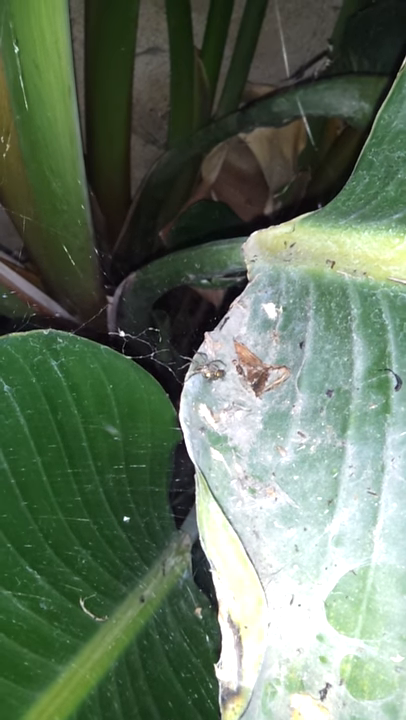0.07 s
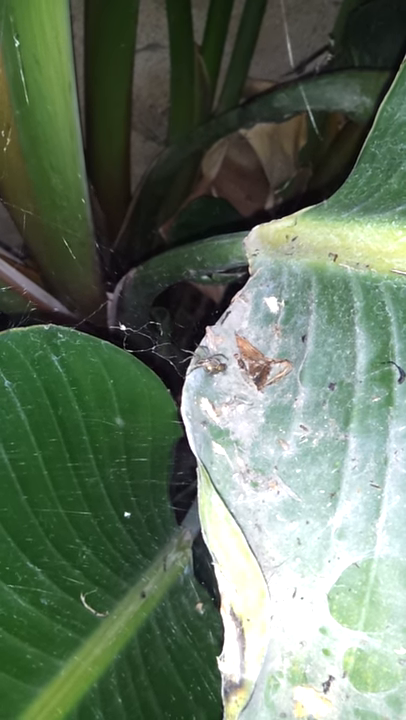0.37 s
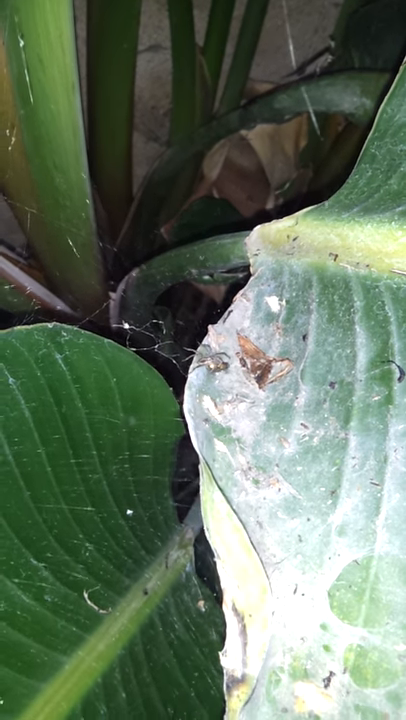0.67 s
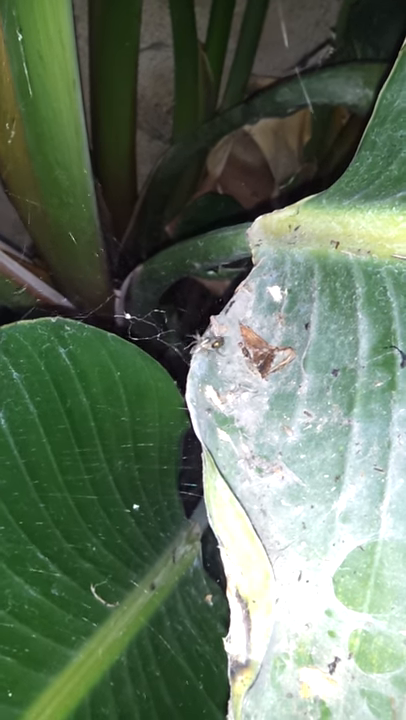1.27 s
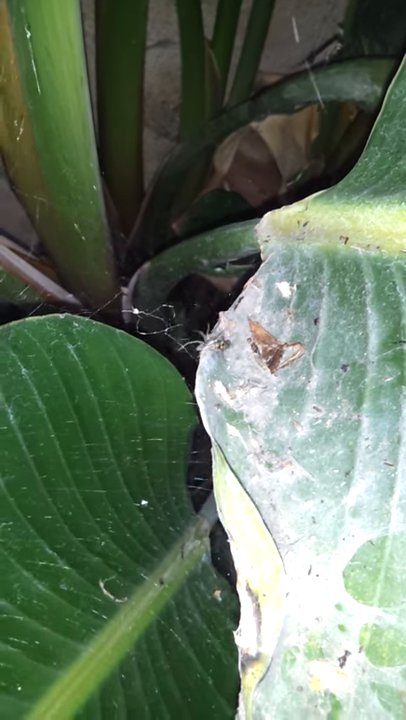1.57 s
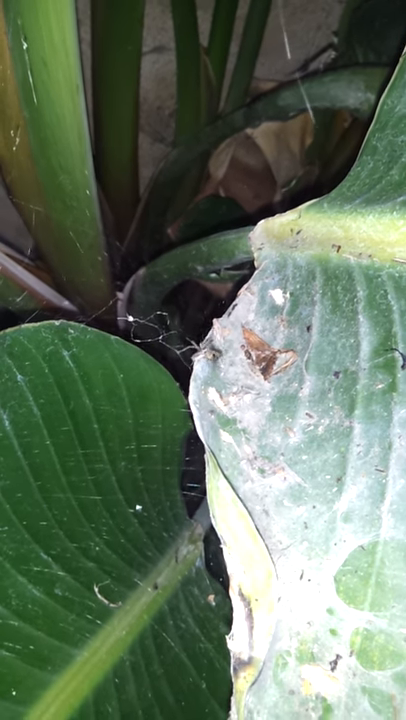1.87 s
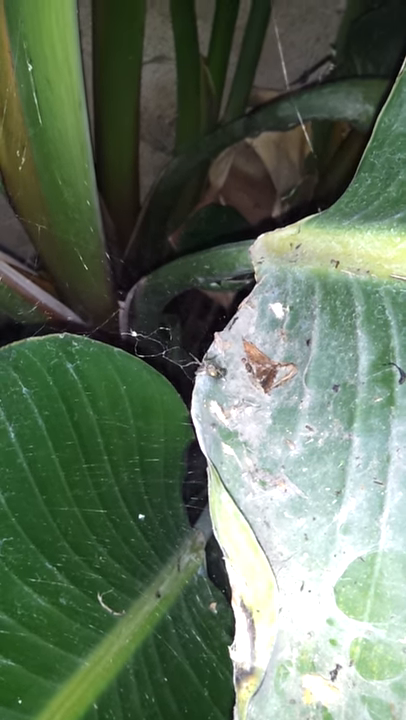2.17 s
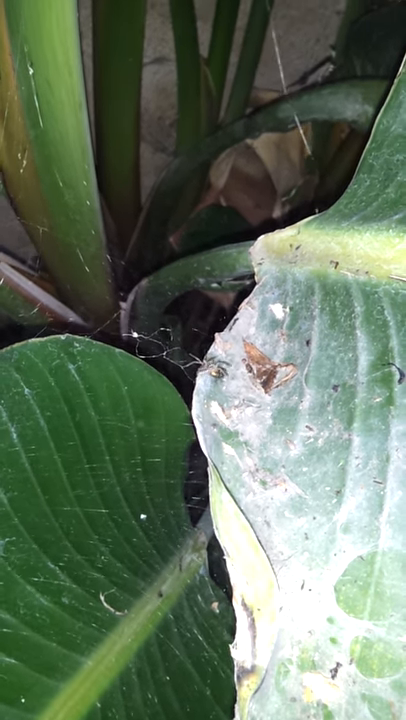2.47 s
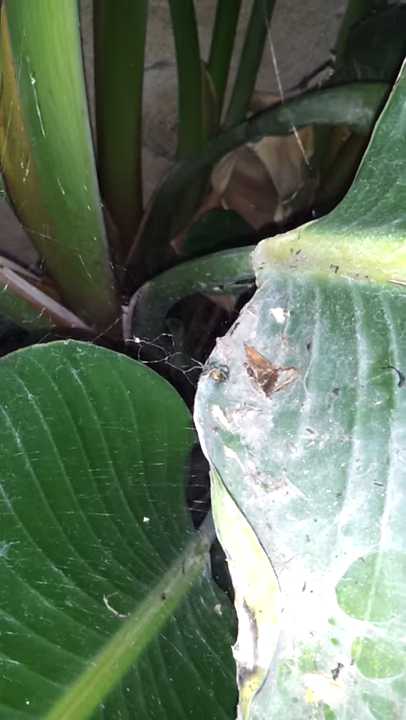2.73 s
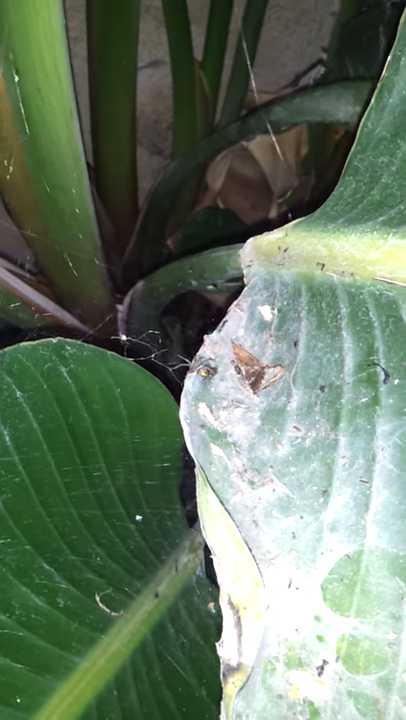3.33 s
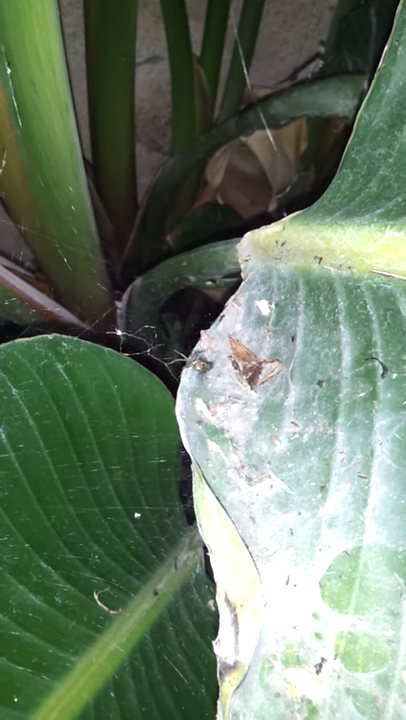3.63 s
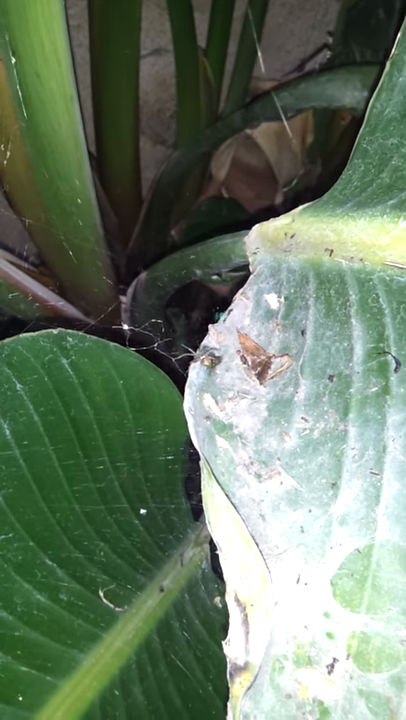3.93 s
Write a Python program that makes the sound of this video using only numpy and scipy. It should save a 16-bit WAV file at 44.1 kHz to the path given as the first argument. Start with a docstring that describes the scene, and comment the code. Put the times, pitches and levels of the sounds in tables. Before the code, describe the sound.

Distant traffic rumbles steadily behind a garden, with a faint bird chirping.

```python
"""A garden bed in town, one microphone in among large leaves. From the start distant traffic rumbles
under a wash of tyre noise, far engines and machinery swell and fade, and a faint hiss sits on top.
Almost at once a small bird gives thin, mostly falling calls, echoed by walls. At about 1.6 s a leaf
brushes softly close to the microphone, and again near 2.1 s. The bird calls on, ending in a flurry."""
import sys
import numpy as np
from scipy import signal
from scipy.fft import rfft, irfft
from scipy.io import wavfile

SR = 44100
rng = np.random.default_rng(int(sys.argv[2]) if len(sys.argv) > 2 else 0)


def unload_audio(sound):
    """Save the sound as a 16-bit wav file, at the path given as the first command line argument."""
    columns = np.transpose(np.atleast_2d(sound))
    # keep every value between -1 and 1, then stretch to whole-number steps
    steps = np.round(np.clip(columns, -1, 1) * 32767)
    wavfile.write(sys.argv[1], SR, steps.astype(np.int16))


N = 176400


def undb(db):
    """Decibels to gain."""
    return 10 ** (np.asarray(db) / 20)


def unit(x):
    """Scale to rms 1."""
    return x / np.sqrt(np.mean(x ** 2))


def times():
    """Time of each sample in s."""
    return np.arange(N) / SR


def curve(rows):
    """Each column of a table joined by straight lines in time."""
    rows = np.array(rows, float)
    return [np.interp(times(), rows[:, 0], col) for col in rows.T[1:]]


def walk(rate_hz):
    """Smooth random motion with spread 1, up to about rate_hz."""
    f = np.arange(N + 1) * SR / (2 * N)
    white = rfft(rng.standard_normal(2 * N))
    return unit(irfft(white * np.exp(-(f / rate_hz) ** 2)))[:N]


def coloured(points):
    """Noise of rms 1 with a spectrum of (Hz, dB) points, falling away below the first."""
    hz, db = np.array(points, float).T
    f = np.maximum(np.arange(N // 2 + 1) * SR / N, 1)
    gain = undb(np.interp(np.log(f), np.log(hz), db))
    low_cut = np.minimum(f / hz[0], 1) ** 2
    return unit(irfft(rfft(rng.standard_normal(N)) * gain * low_cut, N))


# Distant streets as they reach the garden (frequency [Hz], relative density [dB])
TRAFFIC_SPECTRUM = [(20, -4.5), (32, 4.5), (50, -3), (92, 1), (118, -8), (150, -8.5), (185, -6.5),
                    (210, -7.5), (255, -9.5), (320, -13), (425, -18), (470, -14.5), (560, -18),
                    (740, -18.5), (1030, -16.5), (1350, -21), (2000, -30.5), (3000, -38.5), (6000, -49.5)]

def traffic(level_db=-32.5, swell_db=0.42, flicker_db=0.13, recede_db_per_s=0.05, bands=9):
    """Distant rumble and tyre wash, in octave bands that swell together and flicker alone."""
    spectrum = rfft(coloured(TRAFFIC_SPECTRUM))
    swell = swell_db * walk(0.58) - recede_db_per_s * (times() - N / SR / 2)
    hz = np.maximum(np.arange(N // 2 + 1) * SR / N, 1)
    octave = np.clip(np.log2(hz / 20), 0, bands - 1)
    wash = np.zeros(N)
    for k in range(bands):
        band = irfft(spectrum * np.maximum(1 - abs(octave - k), 0), N)
        wash += band * undb(swell - flicker_db * walk(21))
    return undb(level_db) * wash


# Two vehicles streets away, one low-revving, one pulling off (time [s], firing rate [Hz], level [dB])
LOW_REVVING = [(0, 50.7, -23), (.25, 53, -36), (.45, 56.2, -30), (.62, 56.25, -39), (1.2, 53.7, -31.5),
               (1.5, 54.96, -40), (1.8, 55.1, -36.5), (2.3, 55, -37.5), (2.52, 54.9, -28.5),
               (2.75, 54.9, -48), (3.0, 54, -27), (3.4, 54.77, -42), (3.68, 55.2, -31), (4, 54.8, -36)]
PULLING_AWAY = [(0, 68.4, -64), (.15, 68.1, -44), (.35, 69.37, -31.5), (.75, 72.9, -34.5),
                (1.15, 74.86, -38.5), (1.5, 73.16, -33), (1.8, 72.05, -47.5), (2.12, 69.93, -27),
                (2.4, 72.9, -39.5), (2.72, 75.86, -28), (3.12, 76.3, -29), (3.35, 77.3, -39),
                (3.5, 79.15, -30), (3.65, 78.9, -42), (4, 77, -38)]

def exhaust(rows, smear=0.33, smear_hz=26, octave_db=-17.5):
    """A far engine's firing tone and its octave, smeared by many paths through the streets."""
    hz, db = curve(rows)
    firing = np.exp(2j * np.pi * (np.cumsum(hz) / SR + rng.random()))
    tone = firing + undb(octave_db) * firing ** 2
    paths = 1 + smear * (walk(smear_hz) + 1j * walk(smear_hz))
    return undb(db) * unit((paths * tone).real)


# Three hums of machinery far beyond the garden (time [s], pitch [Hz], level [dB])
LOW_HUM = [(0, 146, -38.5), (.25, 145, -38.5), (.75, 145.1, -53.5), (.95, 145.3, -37.5), (1.05, 146, -42),
           (1.22, 145.7, -34.5), (1.6, 145, -44), (2.05, 145.2, -47), (2.3, 144.3, -41), (2.6, 146, -36.5),
           (3.3, 144.6, -35), (4, 144, -38.5)]
MID_HUM = [(0, 263.8, -49.5), (.3, 267.8, -44.5), (.6, 276.6, -55), (1.4, 275, -56.5), (2.0, 276, -45),
           (2.4, 274.6, -48), (3.05, 277.4, -47), (4, 279, -50.5)]
HIGH_HUM = [(0, 383.4, -57), (.8, 378.2, -52), (1.9, 385.3, -51), (2.7, 380.6, -47), (3.2, 384.7, -52.5),
            (4, 385.9, -52.5)]

def machinery(rows, pitch_wander=0.00331, waver_db=1.36):
    """A far machine's clean hum, wavering a little in pitch and level."""
    hz, db = curve(rows)
    cycles = np.cumsum(hz * (1 + pitch_wander * walk(4.37))) / SR + rng.random()
    return np.sqrt(2) * np.sin(2 * np.pi * cycles) * undb(db + waver_db * walk(7.8))


# Colour of the background hiss (frequency [Hz], relative density [dB])
HISS_SPECTRUM = [(1500, -26), (3000, -5), (4200, 0.5), (5400, 2), (6300, -.5), (7200, 1.5), (8000, -0.5),
                 (10000, 1), (12000, -2)]
# Its strength at the microphone (time [s], level [dB])
HISS_CONTOUR = [(0, -55), (.2, -55.5), (.35, -58), (.55, -57.5), (.78, -54.5), (1.03, -55), (1.13, -58.5),
                (1.25, -58.5), (1.42, -53), (1.55, -55.5), (1.76, -54), (1.89, -58.5), (2.0, -54),
                (2.4, -54), (2.8, -55.5), (3.45, -56.5), (3.58, -55), (4, -58)]

def hiss():
    """Faint high hiss that rises and sinks slightly."""
    db, = curve(HISS_CONTOUR)
    return coloured(HISS_SPECTRUM) * undb(db)


# A small bird, faint at the microphone
# (start [s], length [s], glide from [Hz], glide to [Hz], level [dB], rasp [0-1])
BIRD_NOTES = [(0.03, 0.12, 5300, 5340, -61, .9), (.18, 0.11, 4750, 4000, -54, 0.6),
              (0.879, 0.13, 5060, 4950, -61, .6), (1.389, .12, 7370, 7360, -66, 0.89),
              (1.965, 0.11, 5600, 5500, -61, .4), (2.193, .06, 5000, 5100, -58, .3),
              (2.272, .05, 5540, 5650, -60, 0.35), (2.715, 0.036, 3550, 3400, -58, 0.36),
              (3.559, 0.1, 5300, 5400, -55.5, 1), (3.66, 0.0877, 5415, 5100, -63, 0.89),
              (3.68, .2, 8630, 6850, -67, .5), (3.732, 0.14, 4726, 3800, -57.5, 0.7)]

def bird(scoop=0.12, scoop_s=0.014, ramp_s=0.012, rasp_width_hz=450, rasp_fade_s=0.11):
    """Thin notes that scoop up with a rasp, then glide and fade."""
    t, calls = times(), np.zeros(N)
    pitch_jitter = 1 + 0.026 * walk(367)
    flutter = walk(rasp_width_hz) + 1j * walk(rasp_width_hz)
    for start, length, from_hz, to_hz, db, rasp in BIRD_NOTES:
        age = np.clip(t - start, 0, length)
        progress = age / length
        glide = from_hz + (to_hz - from_hz) * progress
        hz = glide * (1 - scoop * np.exp(-age / scoop_s)) * pitch_jitter
        ramps = np.minimum(np.minimum(age, length - age) / ramp_s, 1)
        envelope = ramps * np.exp(-0.4 * progress)
        whistle = np.exp(2j * np.pi * np.cumsum(hz) / SR)
        roughness = 1 + rasp * flutter * np.exp(-age / rasp_fade_s)
        calls += undb(db) * envelope * (whistle * roughness).real
    return calls


def walls(direct, t60_s=0.55, echo_db=-0.5):
    """The direct sound plus a short tail of reflections off the walls round the garden."""
    tail = rng.standard_normal(N) * np.exp(-np.log(1000) * times() / t60_s)
    tail /= np.sqrt(np.sum(tail ** 2))
    return direct + undb(echo_db) * signal.fftconvolve(direct, tail)[:N]


# Brushes of a leaf beside the microphone (peak time [s], rise [s], fall [s], level [dB])
LEAF_BRUSHES = [(1.595, .005, 0.0092, -50.5), (1.628, 0.013, 0.015, -41.5), (1.65, 0.011, 0.036, -47),
                (2.08, .022, 0.02, -49)]
# Colour of the rubbing at close range (frequency [Hz], relative density [dB])
LEAF_SPECTRUM = [(1200, 1), (3000, 0.5), (5500, 4), (9500, 2.5), (12000, -8.5)]

def leaf(grain_db=1.5):
    """Short grainy swishes of a leaf being brushed close by."""
    t, envelope = times(), np.zeros(N)
    for peak, rise, fall, db in LEAF_BRUSHES:
        envelope += undb(db) * np.exp(-np.maximum((peak - t) / rise, (t - peak) / fall))
    rubbing = coloured(LEAF_SPECTRUM) * undb(grain_db * walk(230.4))
    return envelope * unit(rubbing)


def scene():
    """The far town and the near garden at one microphone among the leaves."""
    engines = exhaust(LOW_REVVING) + exhaust(PULLING_AWAY)
    hums = machinery(LOW_HUM) + machinery(MID_HUM) + machinery(HIGH_HUM)
    return (traffic() + engines + hums + hiss() + walls(bird()) + leaf())[None]


def record(dry):
    """The recorder cuts the top steeply above 11850 Hz."""
    return signal.sosfilt(signal.ellip(12, .1, 80, 11850, fs=SR, output="sos"), dry)


dry = scene()
out = record(dry)
unload_audio(out)
```